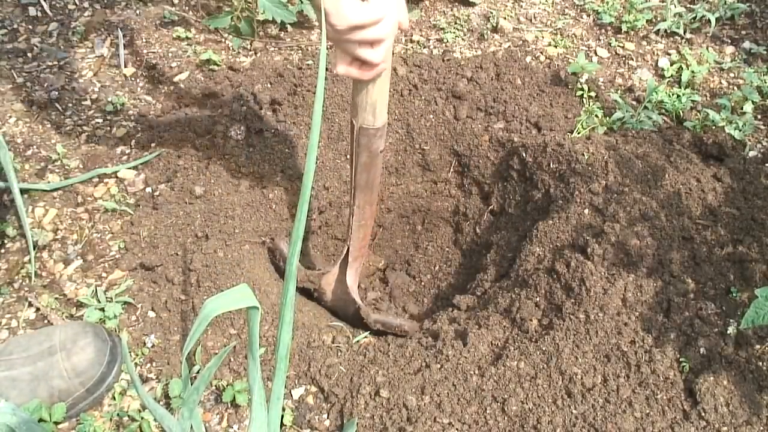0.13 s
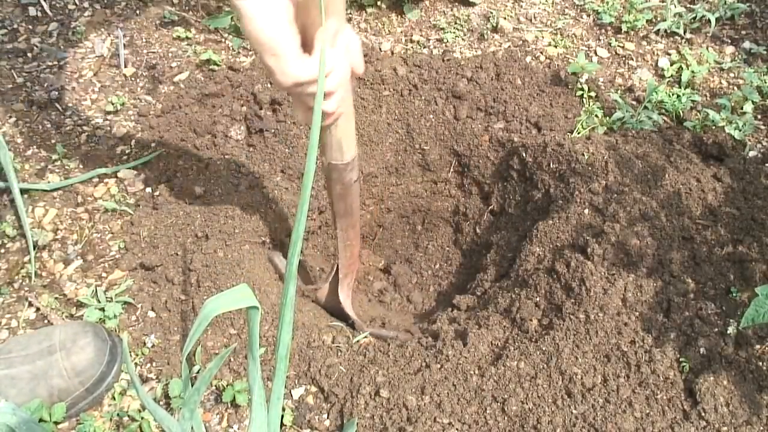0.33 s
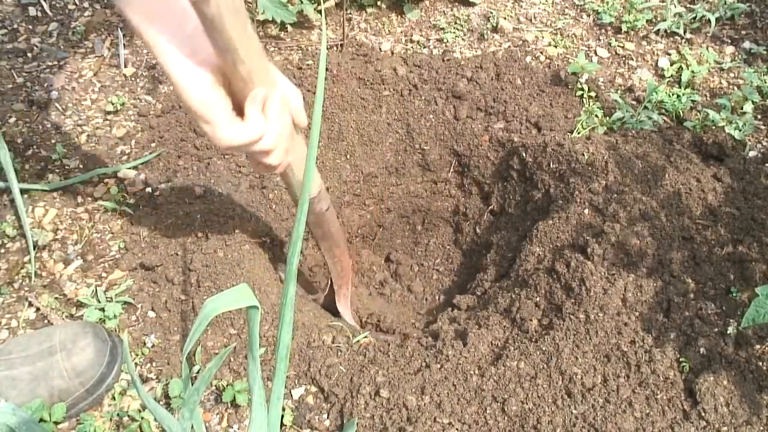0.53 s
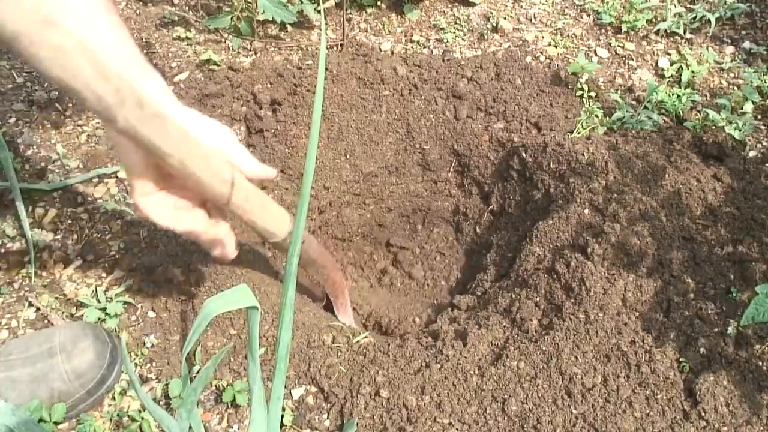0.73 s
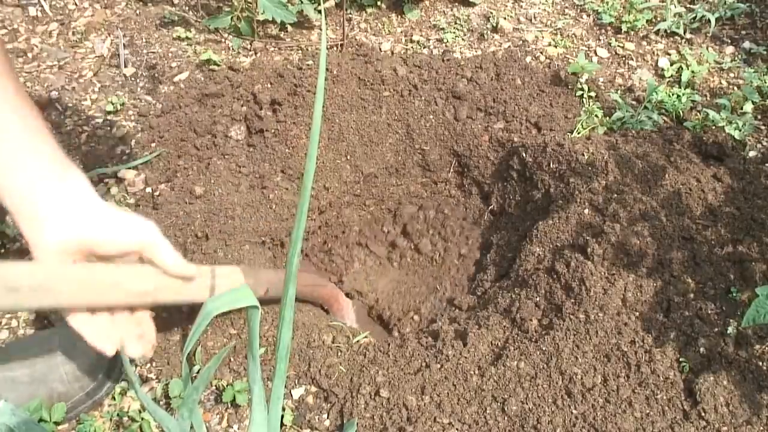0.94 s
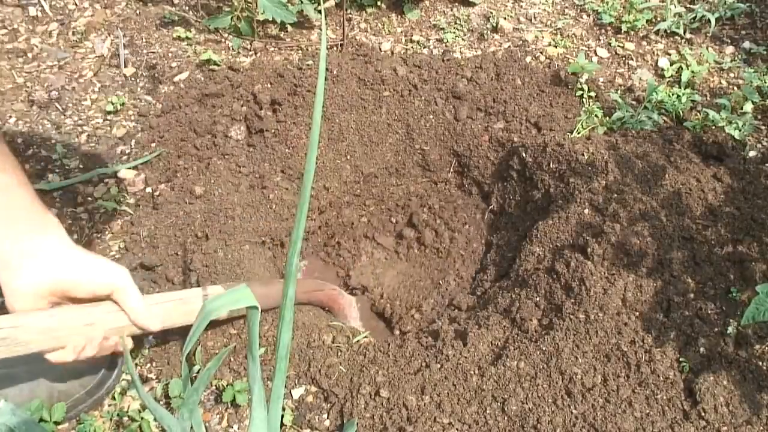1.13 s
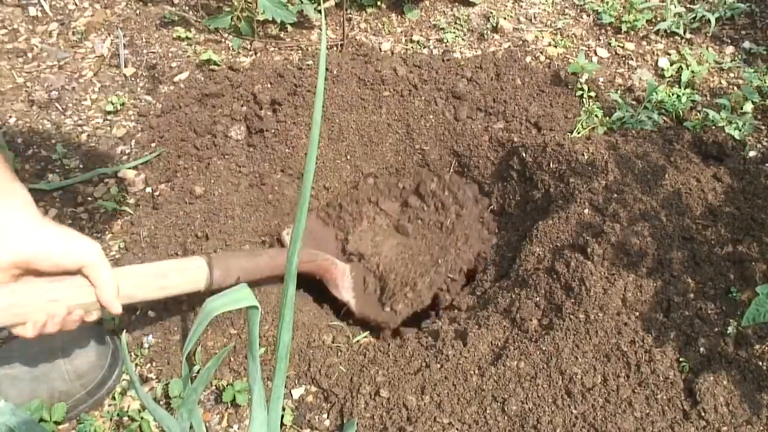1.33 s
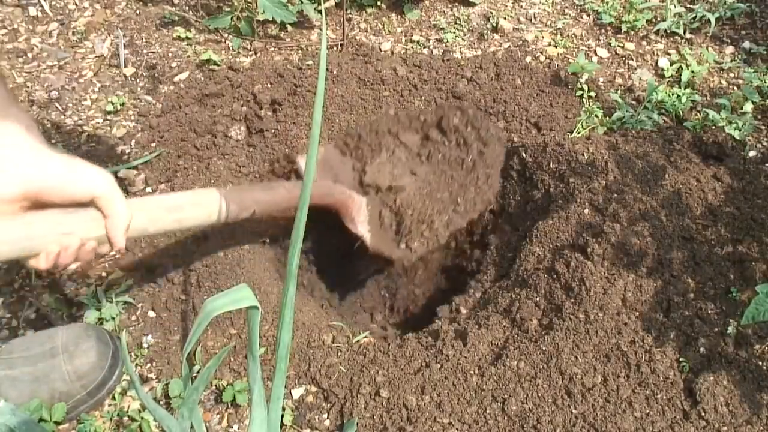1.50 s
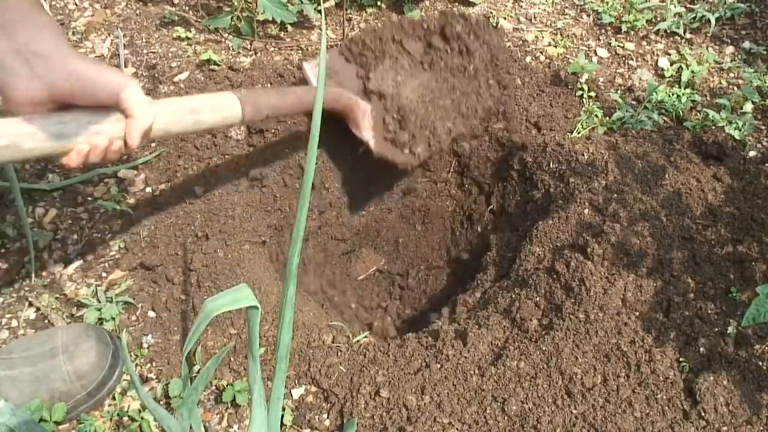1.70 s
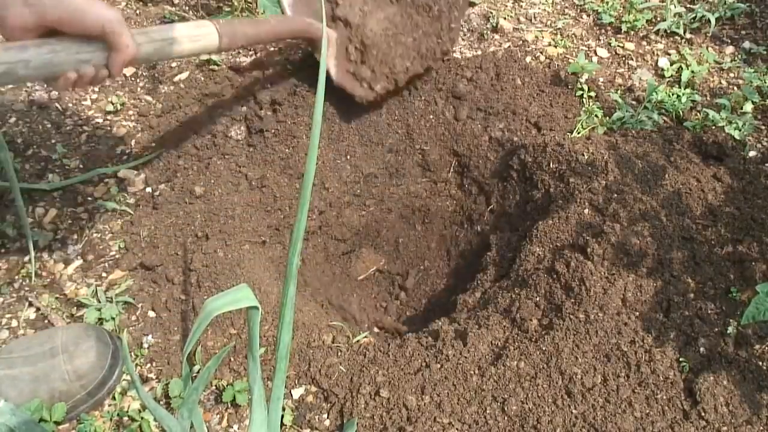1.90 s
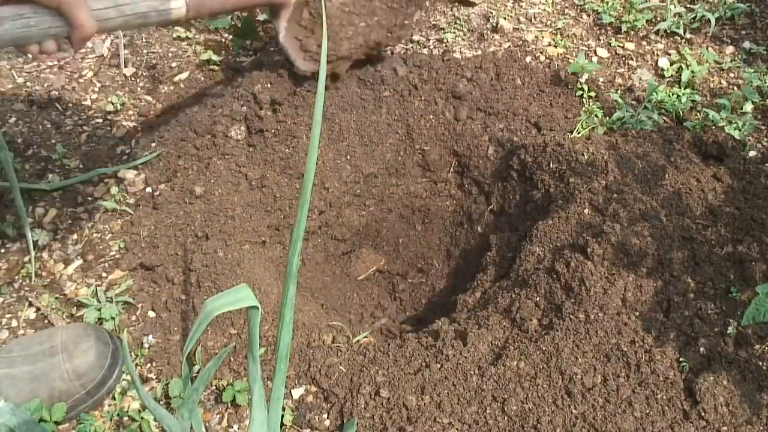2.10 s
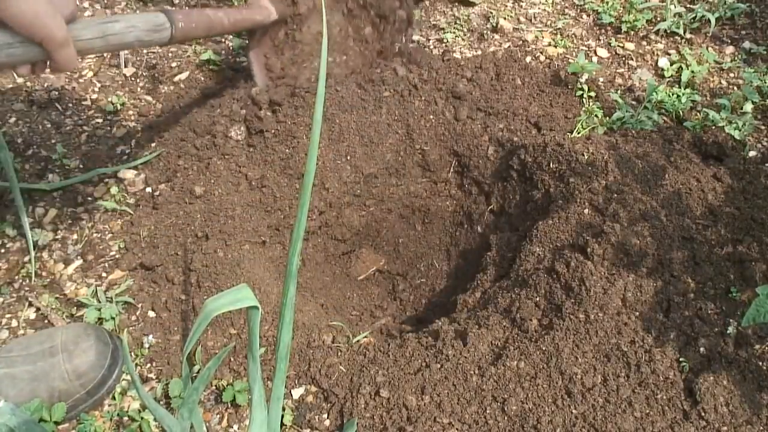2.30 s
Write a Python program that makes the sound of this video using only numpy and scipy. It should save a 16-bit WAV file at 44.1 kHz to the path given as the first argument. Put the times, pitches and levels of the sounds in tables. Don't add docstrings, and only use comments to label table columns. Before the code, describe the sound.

A spade digs into loose garden soil, close up outdoors: dull jolts and gritty metallic scraping build to a loud crunching crack, then soft crumbs trickle while distant birds whistle over a faint low hum.

```python
import sys
import numpy as np
from scipy import signal
from scipy.io import wavfile
from scipy.ndimage import uniform_filter1d

SR = 44100
rng = np.random.default_rng(int(sys.argv[2]) if len(sys.argv) > 2 else 0)


def invert_db(level):
    return 10 ** (np.asarray(level, dtype=float) / 20)


def to_wav(s):
    ch = np.atleast_2d(s).T
    pcm = np.round(np.clip(ch, -1, 1) * 32767)
    wavfile.write(sys.argv[1], SR, pcm.astype(np.int16))


N = 103635
T = np.arange(N) / SR


def evened(x):
    return x / np.sqrt(np.mean(x ** 2) + 1e-20)


def read(points, hz):
    f, value = np.transpose(points)
    return np.interp(np.log(hz + 1), np.log(f + 1), value)


def colour(x, points):
    gain = np.log(invert_db(read(points, abs(np.fft.fftfreq(4096, 1 / SR)))))
    taps = np.fft.ifft(np.exp(np.conj(signal.hilbert(gain)))).real[:2048]
    return signal.oaconvolve(x, taps)[:len(x)]


def mode(x, hz, width):
    r = np.exp(-np.pi * width / SR)
    return signal.lfilter([1 - r, 0, r - 1], [1, -2 * r * np.cos(2 * np.pi * hz / SR), r * r], x)


def body(x, modes):
    click = 1. * (np.arange(4096) == 0)
    taps = sum(invert_db(db) * mode(mode(click, hz, width), hz, 3.26 * width) for hz, width, db in modes)
    return signal.oaconvolve(x, taps / np.linalg.norm(taps))[:N]


def spade():
    thud, ring, grit = np.sqrt(slips() + sand()) * grains() + knocks()
    return soil_thud(thud) + blade_ring(ring, grit) + pings() + grit_hiss(grit)


# time in seconds, peak level of the ring in dB, level of the thud in dB.
KNOCKS = [(0.0341, -40, -36.5), (0.0513, -43, -35.5), (0.079, -31.5, -38), (0.1069, -29, -41),
          (0.126, -37, -37.5), (0.1416, -47, -43), (0.1708, -27.5, -33), (0.1892, -27.5, -33.5),
          (0.2179, -54, -36), (0.2265, -56, -25.5), (0.2431, -48, -27.5), (0.2744, -47, -27),
          (0.4169, -16.5, -43.5), (0.4708, -12, -45), (0.5393, -40, -50), (0.5744, -15.5, -35.5),
          (0.6604, -21, -42), (0.6345, -22, -31), (0.733, -18.5, -34.5), (0.7692, -36, -29),
          (0.8013, -12, -22.5), (0.8292, -4.5, -21.5), (.8347, -2, -16.5), (.8485, -0.5, -21),
          (.8642, -18, -16.5), (0.8843, -24, -21), (1.982, -40, -46)]
KNOCK_DB = [-6, -8.5, -13]


def knocks():
    thud_lag = round(0.001 * SR)
    push = np.zeros((3, N))
    bursts = rng.standard_normal((40, 300))
    fall = np.exp(-np.arange(300) / SR / 0.0011)
    first_hit = 2.77 * (np.arange(300) < 4)
    soft_push = evened(fall ** 3 - fall ** 6)
    for (start, ring_db, thud_db), burst in zip(KNOCKS, bursts):
        at = round(start * SR)
        push[0, at + thud_lag:][:300] += invert_db(thud_db + KNOCK_DB[0]) * soft_push
        hard_push = evened(fall * (burst + first_hit))
        push[1:, at:at + 300] += invert_db(ring_db + np.array(KNOCK_DB[1:]))[:, None] * hard_push
    return push


# start in seconds, length in seconds, then the levels of
# thud, ring and grit in dB.
SLIPS = [(0.058, 0.058, -35.5, -60, -41.5), (0.235, 0.072, -20.5, -27, -37), (0.311, 0.0098, -22, -19, -26),
         (0.326, 0.025, -17.5, -15, -23.5), (0.35, 0.008, -34, -26, -34), (0.397, 0.0083, -45, -34, -24),
         (0.086, 0.006, -33, -50, -55), (0.423, 0.029, -34, -22, -25), (0.435, 0.033, -28.5, -23, -28),
         (0.481, 0.0072, -48, -23.5, -44), (0.534, 0.0085, -50, -20, -33),
         (0.553, 0.019, -29.5, -23.5, -50), (0.588, 0.019, -35.5, -33, -52), (0.625, 0.028, -38, -30, -27),
         (0.659, 0.0088, -20.5, -19.5, -34.5), (0.749, 0.0096, -23.5, -28, -26.5),
         (0.761, 0.0065, -44, -27, -32), (0.806, 0.01, -19.5, -21, -28), (0.82, 0.0089, -25, -22.5, -25),
         (0.826, 0.0061, -29, -8, -18), (0.833, 0.0099, -19.5, -4, -15),
         (0.846, 0.0075, -12.5, -6.5, -19.5), (0.8607, 0.012, -11.5, -7, -23),
         (0.8752, 0.012, -23.5, -19, -20.5), (0.897, 0.027, -39, -39, -63), (1.07, 0.059, -44, -38, -44),
         (2.3065, 0.0016, -72, -39, -36)]


def slips():
    rise_s, fall_s = 0.0013, 0.0024
    power = np.zeros((3, N))
    for start, length, *db in SLIPS:
        grip = np.clip((T - start) / rise_s, 0, 1)
        let_go = np.exp(-np.clip(T - start - length, 0, 1) / fall_s)
        power += (invert_db(np.array(db))[:, None] * grip * let_go) ** 2
    return power


LIFT_S = 1.2
# time in seconds, level in dB.
SAND = [(0, -41.5), (.11, -39.5), (.15, -46), (.24, -36.5), (.38, -27), (.47, -26.5), (.52, -33),
        (.66, -28), (.69, -38.5), (.95, -45), (1.05, -47), (1.15, -55.5), (1.37, -56), (1.42, -50.5),
        (1.6, -43), (1.72, -55), (2.2, -74), (2.33, -50)]
SAND_SHARE_DB = [-8.5, -4.5, -1.5]


def sand():
    level_db = np.interp(T, *np.transpose(SAND)) + np.array(SAND_SHARE_DB)[:, None]
    on_blade = T < LIFT_S
    return invert_db(level_db) ** 2 * [on_blade, on_blade, np.ones(N)]


def grains():
    grains_per_s, spread_db, clump_db = 9000, 3.2, 2.4
    clumps = evened(uniform_filter1d(rng.standard_normal(N), size=130))
    size_db = spread_db * np.minimum(rng.exponential(1, (3, N)), 4) + clump_db * clumps
    sign = rng.choice([-1., 1.], (3, N))
    hits = rng.random((3, N)) < grains_per_s / SR
    return evened(invert_db(size_db) * sign * hits)


# pitch in Hz, width in Hz, level in dB.
THUD = [(300, 111, 5), (406, 143, 3.5), (560, 102, 3), (854, 63, -10)]
# pitch in Hz, width in Hz, level in dB.
CRUNCH = [(300, 140, 6.5), (560, 296, 9), (790, 580, -21)]


def soil_thud(push):
    crushed = T >= 0.815
    return body(push * ~crushed, THUD) + body(push * crushed, CRUNCH)


# pitch in Hz, width in Hz, level in dB.
RING = [(1184, 120, -3), (1531, 154, 2), (1680, 284, 5.5), (2018, 390, 7), (2250, 160, -11), (2486, 590, 0),
        (2900, 160, -3), (3200, 110, -20), (3560, 280, -2)]
# pitch in Hz, width in Hz, level in dB.
SUNK = [(660, 210, 5), (1069, 145, 14), (1206, 19, 10), (1480, 120, 6), (1986, 65, 5), (3270, 180, -15),
        (3890, 200, -21), (4800, 160, -23)]


def blade_ring(push, grit):
    deep = np.clip((0.472 - T) / 0.038, 0, 1)
    sings = np.clip(np.minimum(T - 0.2, 0.384 - T) / 0.014, 0, 1)
    ring = body(push * (1 - deep), RING) + body(push * deep, SUNK)
    return ring + invert_db(-6.5) * body(grit * sings, SUNK[5:])


# time in seconds, pitch in Hz, # time to fade by 60 dB in seconds, level in dB.
PINGS = [(.034, 4020, 0.021, -27), (0.051, 2070, 0.027, -27), (0.051, 4080, 0.011, -25),
         (.084, 2100, 0.015, -28), (.097, 4000, .012, -36), (.108, 4700, .012, -23.5),
         (.108, 2700, 0.014, -22.5), (.127, 4800, .01, -34), (.178, 1710, 0.0076, -23),
         (.189, 3200, 0.011, -21.5), (.229, 4600, .01, -37), (0.231, 1125, .015, -13),
         (0.273, 3100, 0.013, -18), (0.309, 3200, 0.028, -19), (0.456, 1810, .025, -14),
         (0.468, 1440, 0.016, -25), (.714, 300, .04, -32), (.7325, 2900, 0.014, -13),
         (0.734, 1750, 0.012, -15), (0.733, 4600, 0.011, -20), (0.7325, 300, 0.11, -21),
         (0.751, 316, 0.069, -19), (.768, 318, 0.087, -23), (0.8018, 430, 0.058, -14.5),
         (.8015, 2240, .012, -5), (.81, 5150, 0.013, -16), (0.8632, 1390, 0.02, -6.5),
         (.869, 2070, 0.043, 1.5), (.662, 335, 0.038, -27), (.574, 1820, .012, -17),
         (.2285, 560, 0.025, -20)]


def pings():
    t, out = np.arange(4000) / SR, np.zeros(N)
    rise = 1 - np.exp(-t / 0.0004)
    for start, hz, t60, db in PINGS:
        note = invert_db(db - 60 * t / t60) * np.sin(2 * np.pi * hz * t)
        out[round(start * SR):][:4000] += rise * note
    return out


# frequency in Hz, gain in dB.
GRIT = [(700, -78), (1500, 4), (3500, 5.5), (6000, 0.5), (8500, 0), (11000, -6.5), (15500, -29)]
# frequency in Hz, gain in dB.
CRUMBS = [(1200, 4.5), (4800, 6.5), (7800, -0.5), (10000, -16)]


def grit_hiss(push):
    falling = (T > LIFT_S) & (T < 2.2)
    return invert_db(2.5) * colour(push * ~falling, GRIT) + colour(push * falling, CRUMBS)


# frequency in Hz, side against middle in dB.
SIDE_DB = [(60, 0), (110, -5), (200, -15), (380, -20), (700, -25), (1290, -32), (2380, -19), (4400, -4),
           (8120, -5), (15000, 3)]


def ports(x, other):
    side = colour(other, SIDE_DB)
    return np.array([invert_db(0.5) * (x + side), x - side])


# frequency in Hz, gain in dB.
MIC = [(9500, -4), (11500, -7), (13000, -10), (14300, -5), (15200, -34)]


def microphones(x):
    near = 1.51 * np.tanh(x / 1.747)
    return np.array([colour(port, MIC) for port in near])


def shove():
    return -invert_db(-19) * np.exp(-((T - 0.8355) / 0.0016) ** 2)


# start in seconds, length in seconds, level in dB.
DUST = [
    (0.897, 0.065, -58),
    (0.986, 0.11, -55),
    (2.232, 0.14, -60.5),
]


def dust():
    hz, width_hz = 11800, 3500
    swell = sum(invert_db(db) * np.sin(np.pi * np.clip((T - start) / length, 0, 1)) for start, length, db in DUST)
    hiss = mode(mode(rng.standard_normal((2, N)), hz, width_hz), hz, width_hz)
    return swell * evened(hiss)


# start in seconds, length in seconds, first pitch in Hz, last pitch in Hz, level in dB.
NOTES = [(1.049, 0.087, 2950, 2796, -57), (1.124, 0.028, 2800, 3160, -53), (1.138, 0.054, 2880, 2830, -63),
         (1.147, 0.041, 2560, 2230, -58), (1.199, .032, 2850, 2870, -59), (1.212, 0.06, 2740, 2537, -55.5),
         (1.266, 0.062, 2600, 2587, -61), (1.206, 0.027, 2260, 2260, -61), (1.336, 0.051, 2920, 2880, -70),
         (1.337, 0.021, 2550, 2180, -64), (1.379, .014, 5000, 4750, -68), (1.407, 0.02, 4590, 4960, -63),
         (1.624, 0.035, 2350, 2250, -59.5), (1.655, 0.026, 2250, 3280, -55.5),
         (1.686, 0.037, 3250, 3565, -55.5), (1.714, 0.017, 3350, 2450, -56),
         (1.724, 0.043, 2440, 2170, -60), (1.736, .04, 3450, 3320, -63), (1.776, 0.054, 3500, 3180, -67),
         (1.765, 0.021, 2420, 2270, -57.5), (1.82, 0.064, 2220, 2300, -56),
         (1.882, 0.028, 2130, 2080, -58.5), (1.839, 0.076, 3400, 3470, -64.5),
         (1.842, 0.152, 2900, 2943, -61.5), (1.905, 0.076, 2200, 2110, -75)]


def birds():
    song = np.zeros(N)
    wobble = 0.016 * evened(uniform_filter1d(rng.standard_normal(N), size=200))
    for start, length, from_hz, to_hz, db in NOTES:
        u = np.clip((T - start) / length, 0, 1)
        farther_bird = start > 1.73 and from_hz > 2700
        warble = 1 + wobble * (2.6 if farther_bird else 1)
        hz = (from_hz + (to_hz - from_hz) * u) * warble
        swell = np.sqrt(np.sin(np.pi * u) + 1e-12)
        song += invert_db(db + 8.5) * swell * np.sin(2 * np.pi * np.cumsum(hz) / SR)
    tail = rng.standard_normal((SR // 2, 2)).T * invert_db(-60 * T[:SR // 2] / 0.7)
    echo = signal.fftconvolve(song[None], tail / np.linalg.norm(tail[0]), axes=1)[:, :N]
    return song + echo


# pitch in Hz, width in Hz, level in dB.
HUM = [
    (210, 2, -62),
    (56.4, 6.1, -58.5),
]


def hum():
    beat = 1 + np.cos(2 * np.pi * (T - 1.075) / 0.84)
    main = invert_db(-52.5) * beat * np.sin(2 * np.pi * 123.4 * T)
    return main + sum(invert_db(db) * evened(mode(rng.standard_normal(N), hz, width)) for hz, width, db in HUM)


# frequency in Hz, level in dB per Hz.
AIR = [(25, -15), (124, -8), (221, -19), (295, -16), (415, -21.5), (1350, -27.5), (9000, -35.5),
       (13300, -45.5)]
# frequency in Hz, likeness from -1 to 1.
SAME = [(60, 0.34), (130, 0.84), (290, 0.23), (640, -0.031), (1410, 0.61), (3100, 0.34), (6820, -0.14),
        (15000, -0.21)]


def air():
    frames, hz = N // 256 + 5, np.fft.rfftfreq(1024, 1 / SR)
    a, b, c, d, patches = rng.standard_normal((frames, 513, 5)).T
    patches = uniform_filter1d(patches, size=12, axis=0)
    patches = evened(uniform_filter1d(patches, size=14, axis=1))
    same = np.clip(read(SAME, hz), -1, 1)[:, None]
    left = a + 1j * b
    right = same * left + np.sqrt(1 - same ** 2) * (c + 1j * d)
    tone_db = read(AIR, hz) - 40 * (hz > 14300)
    z = np.array([left, right]) * invert_db(tone_db[:, None] + 1.3 * patches)
    return invert_db(-46) * evened(signal.istft(z, nperseg=1024, noverlap=768)[1][:, :N])


def scene():
    near = microphones(ports(spade(), spade()))
    return near + shove() + air() + hum() + birds() + dust()


def roll_off(x):
    return signal.sosfilt(signal.butter(12, 15700, fs=SR, output="sos"), x)


# lower edge of the band in Hz, treble level that opens it in dB.
GATES = [(13480, -63), (14300, -52), (15050, -46)]


def record(dry):
    hz, _, z = signal.stft(dry, SR, nperseg=2048)
    treble = (hz > 11000) & (hz < 13400)
    power = (abs(z[:, treble]) ** 2).sum(1).mean(0)
    treble_db = 10 * np.log10(1.3 * power + 1e-12)
    for edge_hz, open_db in GATES:
        z = z * (1 - (hz > edge_hz)[:, None] * (treble_db < open_db))
    mix = signal.istft(z, SR, nperseg=2048)[1][:, :N]
    return roll_off(mix)


dry = scene()
out = record(dry)
to_wav(out)
```